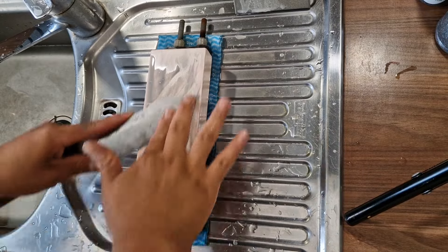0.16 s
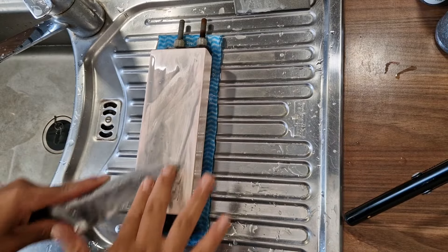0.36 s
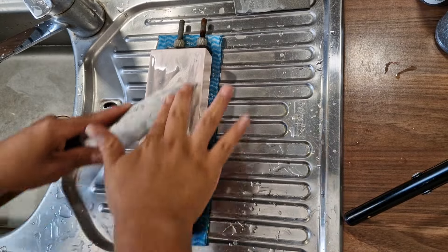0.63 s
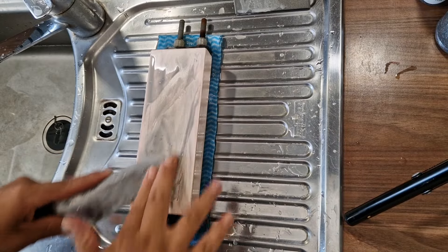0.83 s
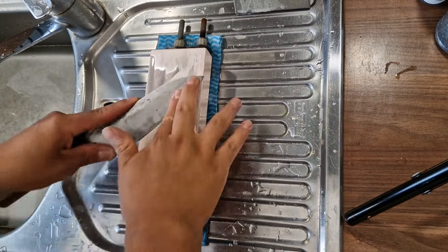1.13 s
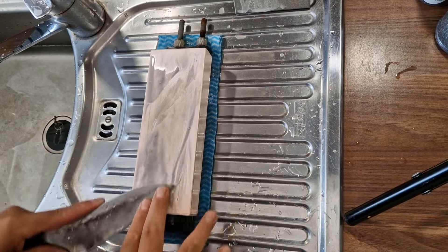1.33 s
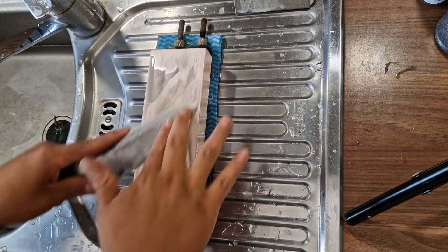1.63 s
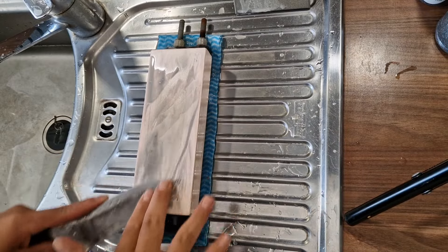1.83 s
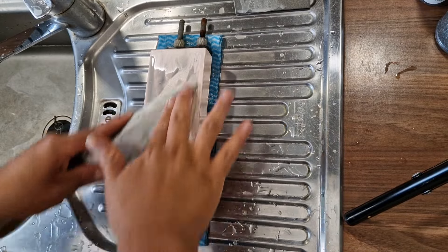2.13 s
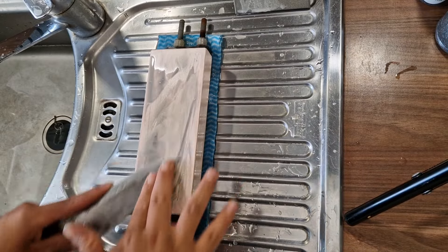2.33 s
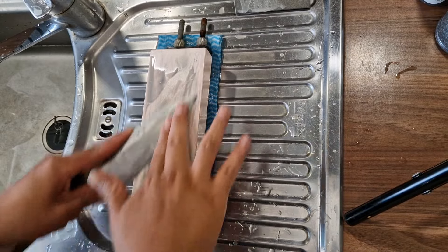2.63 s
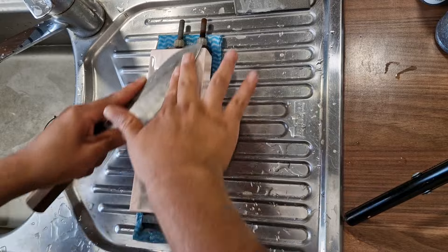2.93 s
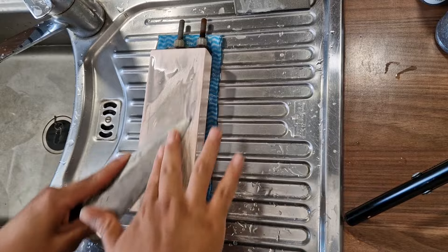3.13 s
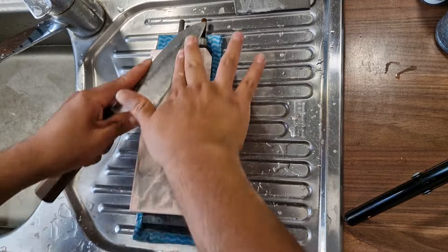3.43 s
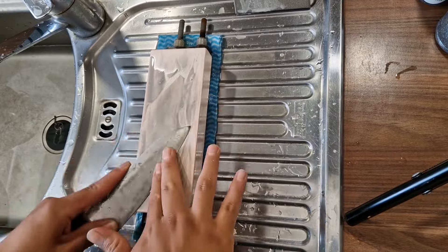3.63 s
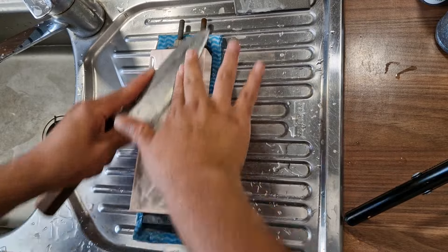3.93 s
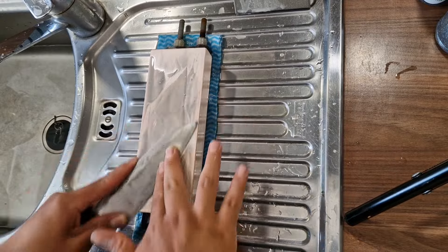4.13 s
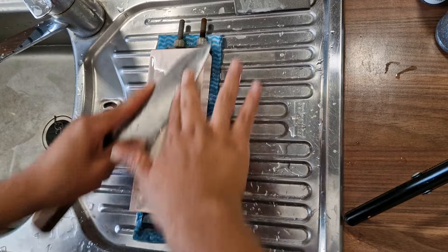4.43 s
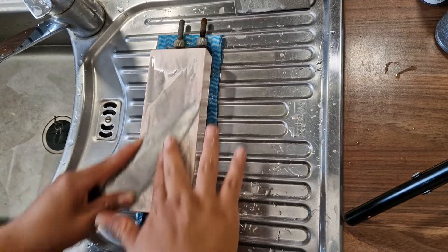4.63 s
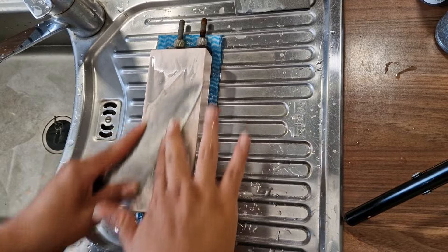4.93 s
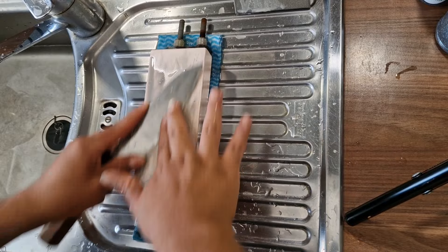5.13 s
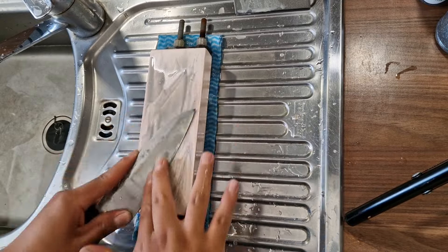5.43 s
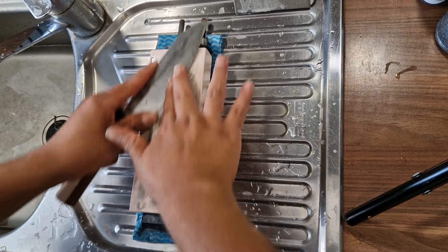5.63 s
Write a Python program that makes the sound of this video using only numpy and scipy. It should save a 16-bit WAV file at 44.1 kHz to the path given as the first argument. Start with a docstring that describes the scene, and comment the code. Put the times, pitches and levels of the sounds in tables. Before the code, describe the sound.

Rapid to-and-fro knife sharpening on a wet stone, a hissy metallic scrape dipping briefly at every reversal over faint kitchen rumble.

```python
"""Gritty hiss comes first, over a hum and a low drone: a steel knife is pushed and pulled along a wet whetstone
on a sink's draining board, close to a stereo microphone. Coloured noise makes the grit's hiss and rings the blade,
whose modes glide and fade as the contact slides. At each turn of the hands the hiss sinks for an instant
and decaying sines thump the counter. Two cracks and a dull tick stand out;
a wavering sine and filtered noise fill the kitchen."""
import sys
import numpy as np
from scipy import signal
from scipy.io import wavfile
from scipy.ndimage import uniform_filter1d

SR = 44100
rng = np.random.default_rng(int(sys.argv[2]) if len(sys.argv) > 2 else 0)


def bounce(signal):
    """Save signal as a 16-bit WAV file at the path given by the first command-line argument."""
    frames = np.transpose(np.atleast_2d(signal))
    limited = np.clip(frames, -1, 1)
    pcm = np.round(limited * 32767).astype(np.int16)
    wavfile.write(sys.argv[1], SR, pcm)


N = 254456
SIZE, HOP = 2048, 256  # spectral frame and step [samples]
HZ = np.fft.rfftfreq(SIZE, 1 / SR)[:, None]
FRAME_S = np.arange(-(-N // HOP) + 1) * HOP / SR
T = np.arange(N) / SR

# the kitchen's hum: (time [s], pitch [Hz], level before its waver [dB])
HUM = [(0.0, 86.2, -59), (0.72, 86.5, -51), (1.01, 87.7, -62), (1.3, 88.8, -62), (1.38, 89.7, -85),
       (1.49, 85.75, -58.5), (1.96, 86.8, -53), (2.45, 90, -73), (2.57, 90.3, -57), (3.05, 89.5, -63),
       (3.15, 89.1, -58.5), (3.6, 89.6, -58.5), (4.39, 90.1, -55.5), (4.46, 89.4, -67), (5.22, 88.9, -56),
       (5.77, 91.3, -61.5)]
# swelling drone: (time [s], middle band [dB], upper band [dB], bass band [dB])
DRONE = [(0.0, -66, -81, -62), (0.35, -72, -65.5, -69), (0.8, -67, -74.5, -65), (1.65, -74.5, -87, -66.5),
         (1.8, -70, -72.5, -61.5), (2.96, -73, -78, -69.5), (3.3, -67.5, -79.5, -59),
         (3.52, -65.5, -63.5, -64), (3.76, -69.5, -78, -67), (4.3, -75, -86, -57.5),
         (5.35, -71.5, -77, -64), (5.53, -59.5, -74, -63), (5.77, -71.5, -74, -59)]
# colour of the room's rumble: (frequency [Hz], relative density [dB per Hz])
RUMBLE_COLOUR = [(11, -9), (18, 8), (96, 12), (148, -4), (220, -62), (314, -13), (422, -31), (718, -15),
                 (792, -20.5), (1300, -16.5), (1640, -14), (1850, -36), (2000, -48), (2600, -94),
                 (4400, -120)]
RUMBLE_DB = -57.5
# likeness of the two microphone ports: (frequency [Hz], likeness [0-1])
PORT_LIKENESS = [(100, 1), (250, 1), (500, 0.57), (1300, 0.42), (2400, 0.077), (4400, 0.51), (6000, 0.1),
                 (15000, 0.045)]
# phase between the ports: (frequency [Hz], lead of the left [radians])
LEFT_LEAD = [(0, -0.5), (860, 0.77), (1210, 4), (1720, -1.5), (2330, -0.76), (3270, 12.5), (3530, 13.5),
             (4310, 17), (5080, 19), (7840, 8.5), (8960, 19), (10600, 13), (14200, 28.5), (16500, 7)]
# balance of the ports: (frequency [Hz], left minus right [dB])
PORT_TILT = [(60, 3), (92, -1.5), (140, 0.5), (210, -5.5), (330, 8), (500, 2.5), (770, 1.5), (1170, -0.5),
             (1790, 6), (2740, -2), (4190, -0.5), (6410, -3.5), (9810, -1.5), (15000, -0.5)]

# modes of the counter: (frequency [Hz], level relative to the thump [dB], t60 [s])
COUNTER_MODES = [(31.96, 4, 0.5), (47, -1, 0.11), (78, -10, .07)]
# dull tick, stronger on the left: (time [s], left peak [dB])
TICKS = [(2.6498, -36)]
# the edge catches a coarse grain: (time [s], level [dB], t60 of the crack [s])
SNAPS = [(2.8986, -23, .016), (4.7644, -36, .025)]

# each stroke starts where the blade reverses, pushes and pulls in turn; levels before fades and lifts:
# (start [s], thump [dB], fall of the hiss in the pause [dB], hiss [dB], swell of the hiss over the stroke [dB],
#  ring of the low, middle, high and top modes [dB each], top of the middle glide [Hz])
STROKES = [(0.0, -54, 4.9, -49, -1.5, -90, -69, -55.5, -55, 3100.0),
           (0.206, -48, 6.6, -49, 6, -72, -54.5, -51.5, -53, 2930.0),
           (0.444, -46.5, 4.3, -48.5, 1, -76, -71, -56.5, -51, 3140.0),
           (0.675, -49, 3.6, -46.5, 4, -82, -60, -52.5, -55, 3053),
           (0.889, -55, 4.3, -51, 3, -81, -57.5, -56, -54, 3000),
           (1.119, -65, 6, -49.5, -5, -70.5, -48, -53, -53, 2700),
           (1.356, -64, 8.7, -49.5, 0.5, -92, -71, -54.5, -54, 3060),
           (1.587, -61, 3.5, -51.5, -4, -80.5, -59.5, -56, -53.5, 2730),
           (1.789, -68, 5.5, -47.5, 16, -80, -58.5, -53, -52.5, 2800),
           (2.047, -48, 8.7, -48, -16.5, -73.5, -53.5, -54.5, -52.5, 2740),
           (2.289, -52.5, 3.9, -47, 7, -68, -50, -51, -47, 2640),
           (2.524, -48, 7.6, -48, -12.5, -62, -56, -53, -49, 3140),
           (2.74, -56, 4.4, -49.5, 6.5, -64, -50.5, -52.5, -48.5, 3200),
           (2.964, -46, 5, -49.5, -1, -61, -52, -54.5, -51, 3140.0),
           (3.182, -50, 4.5, -49.5, 9, -59, -48.5, -50, -52.5, 3230.0),
           (3.418, -46, 6.3, -48.5, -5, -56, -50, -52, -51, 3270.0),
           (3.635, -51, 6, -49.5, 4.5, -57.5, -51.5, -52, -50.5, 3000),
           (3.871, -43.5, 5.6, -49.5, 6, -56, -48.5, -52, -50.5, 3070),
           (4.081, -47.5, 3.9, -47.5, -1, -58.5, -48, -48, -48, 2890.0),
           (4.33, -44, 7.8, -47.5, 2, -55, -50, -50.5, -50, 3040),
           (4.556, -52, 4, -50, -1, -54.5, -48.5, -50.5, -52.5, 2990),
           (4.793, -45.5, 8, -50, 1, -58, -49, -51.5, -49.5, 2930),
           (5.001, -47, 4, -52, -3, -64.5, -56.5, -51, -50, 2970.0),
           (5.231, -43, 8, -49, 5, -68, -56.5, -52.5, -50.5, 2970),
           (5.446, -47, 7, -49, -5.5, -63.5, -64.5, -53, -51, 3270.0),
           (5.687, -46, 7.9, -47, 4, -73, -70, -60, -57, 3290)]
LAST_END_S = 5.9
# spread of the dip at a turn, and how long after the turn it is deepest
PAUSE_S, PAUSE_LATE_S = 0.0078, 0.0091
# part of the edge on the stone:
# (time [s], place [0 heel - 1 tip], middle glide at the far end [Hz], high gliding mode [Hz])
EDGE_PART = [(0, 0.058, 2480, 5200), (1.1, .03, 2450, 5150), (2.1, 0.045, 2800, 5280),
             (2.9, 0.74, 3000, 5150), (3.42, 0.84, 3160, 5220), (3.87, 0.8, 2880, 5100),
             (4.33, 0.91, 2324, 5300), (4.79, 1, 2290, 4950), (5.25, 0.89, 2300, 5000),
             (5.77, 1, 2790, 4900)]
# the edge bites into a coarser patch of stone:
# (time [s], lift of the low and middle modes [dB], lift of the high and top modes [dB])
BITES = [(0.139, 5, 6), (0.311, 8.5, 5), (.778, 13, 1), (1.03, 5, 4), (1.075, 3, 6), (1.165, 7, 1),
         (1.21, 1, 8.5), (1.541, 9, 3), (1.676, 10.5, 4), (2.005, 12, 1), (2.145, 2.5, 2.5),
         (2.41, 5, -1.5), (2.592, 10, 3), (2.782, 5.5, 6.5), (.565, -2, 1.5), (3.023, 10, 4.5),
         (3.203, 4.5, 4.5), (3.387, 3, 1), (3.512, -2, -0.5), (3.662, 1, 3), (3.84, 9, 4), (4.235, 5, -1),
         (4.29, 0.5, 4), (4.385, 2.5, 4.5), (4.44, 3.5, 1), (4.649, 2.5, 3), (4.769, 0, 5.5),
         (4.835, 3, 1.5), (4.899, 1, -1.5), (5.096, 10.5, 4.5), (5.318, 8.5, 0), (5.473, 14, 6),
         (5.757, 11.5, 4)]
BITE_S, BITE_HISS = 0.027, 0.6  # spread in time; share of the upper lift that reaches the hiss

# colour of the bare grit: (frequency [Hz], relative density [dB per Hz])
GRIT_COLOUR = [(1000, -25), (1800, -25.5), (2300, -10), (3000, -7.5), (4100, -16), (4700, -12.5),
               (5800, -11), (7300, -9), (9600, -9.5), (11600, -1), (13500, 0), (15800, -1.5)]
# hiss fade at the near end of the stone (heel dB, tip dB); reach as share of the stone
NEAR_FADE_DB, NEAR_REACH = (-8.5, -3), 0.13
HUMP_DB, HUMP_PER_DB, USUAL_HISS_DB = 7, -0.44, -49.5  # lower treble over the bare grit; its answer to the hiss

# blade modes beside the gliding ones, one table a group:
# (frequency [Hz], width [Hz], level within the group before it wanders [dB])
LOW_MODES = [(738, 22, -17.5), (874, 73, -12.5), (1377, 44, -5.5)]
MIDDLE_MODES = [(2230, 60, -9), (2445, 70, -9), (3150, 90, -12), (3880, 200, -7)]
HIGH_MODES = [(4127, 514, -2.5), (5513, 38, -0.5)]
TOP_MODES = [(6304, 114, -5.5), (6426, 220, -6), (7370, 380, -0.5), (7810, 1300, -8.5)]
# rows for low, middle, high and top modes; place is where on the stone, change is one stone away from there:
# (place at heel [0 near - 1 far], change at heel [dB], place at tip [0-1], change at tip [dB])
RING_PLACES = [(.75, 10, 0.53, -65), (.75, -66.5, 0.64, -7.5), (.75, -14.5, .3, 2), (.8, -13.5, 1, -1)]
LOW_HZ, LOW_NEAR_RISE_HZ = (1664, 1397), 216  # low glide at heel and tip; rise towards the near end
MIDDLE_NEAR_HZ, MIDDLE_TOP_PLACE = 2800, .52  # the middle glide runs from the near end to its turning place
HIGH_WANDER_HZ = 80  # rms


def amp(db):
    """Amplitude factor of a level in dB."""
    return 10 ** (np.asarray(db) / 20)


def intensity(db):
    """Power factor of a level in dB."""
    return amp(2 * np.asarray(db))


def evened(x):
    """Scales a signal to rms 1."""
    return x / np.sqrt(np.mean(x ** 2) + 1e-20)


def smoothed_twice(x, span):
    """Two running means in a row."""
    return uniform_filter1d(uniform_filter1d(x, span), span)


def read(points, hz):
    """Reads a curve between its points on a logarithmic frequency scale."""
    f, value = np.transpose(points)
    return np.interp(np.log(hz + 1), np.log(f + 1), value)


def over_time(table):
    """Reads every column after the time of a table at each frame."""
    s, *columns = np.transpose(table)
    return [np.interp(FRAME_S, s, column) for column in columns]


def add(mix, s, sound):
    """Lays a sound into the mix at s seconds, cut at the end."""
    part = mix[..., round(s * SR):][..., :sound.shape[-1]]
    part += sound[..., :part.shape[-1]]


def drift(count, seconds):
    """Rows of slow chance at frame rate, rms 1."""
    span = max(round(seconds * SR / HOP), 1)
    return evened(smoothed_twice(rng.standard_normal((count, len(FRAME_S))), span))


def mode(hz, width):
    """Power response of a steep resonance, top 1."""
    return 1 / (1 + (2 * (HZ - hz) / width) ** 2) ** 1.276


def unit(power):
    """Scales each frame's power response so that white noise of rms 1 keeps rms 1."""
    return power / power.mean(0)


def coloured(pair, power):
    """Colours two unrelated drives and blends them into what the two microphone ports pick up."""
    left, other = signal.stft(pair, nperseg=SIZE, noverlap=SIZE - HOP)[2]
    same = read(PORT_LIKENESS, HZ)
    right = same * left + np.sqrt(1 - same ** 2) * other
    right = right * np.exp(-1j * read(LEFT_LEAD, HZ))
    tilt = amp(read(PORT_TILT, HZ) / 2)  # half on each side
    ports = np.array([left * tilt, right / tilt]) * np.sqrt(power)
    return signal.istft(ports, nperseg=SIZE, noverlap=SIZE - HOP)[1][:, :N]


def hum():
    """A single sine whose pitch wanders and whose level wavers."""
    s, hz, db = np.transpose(HUM)
    waver_db = 0.89 * np.interp(T, FRAME_S, drift(1, 0.031)[0])
    level = np.sqrt(2) * amp(np.interp(T, s, db) + waver_db)
    return level * np.sin(2 * np.pi * np.cumsum(np.interp(T, s, hz)) / SR)


def drone_and_rumble():
    """White noise through swelling resonant bands and the room's low colour, streaked by slow chance."""
    middle_db, upper_db, bass_db = over_time(DRONE)
    bands = unit(mode(316, 51)) * intensity(middle_db)
    bands += unit(mode(500, 280)) * intensity(upper_db)
    bands += unit(mode(135.6, 20) + intensity(3) * mode(115.0, 20)) * intensity(bass_db)
    rumble = unit(intensity(read(RUMBLE_COLOUR, HZ)) * (HZ < 3000)) * intensity(RUMBLE_DB)
    streaks = intensity(2.75 * drift(len(HZ), 0.23))
    return coloured(rng.standard_normal((2, N)), (bands + rumble) * streaks)


def thumps(cycles=0.21):
    """Each reversal shoves the stone; the counter rings, its deepest modes swelling last."""
    t, out = np.arange(SR // 2) / SR, np.zeros(N)
    ring = np.zeros(len(t))
    for hz, db, t60 in COUNTER_MODES:
        onset = 1 - np.exp(-t * hz / cycles)
        ring += amp(db - 60 * t / t60) * np.sin(2 * np.pi * hz * t) * onset
    for s, db, *_ in STROKES:
        add(out, s, amp(db) * ring)
    return out


def ticks():
    """A dull tick: one pulse that peaks after 0.1 ms and dies away, 9 dB weaker on the right."""
    t, out = np.arange(SR // 6) / SR, np.zeros((2, N))
    pulse = t / .0001 * np.exp(1 - t / .0001)
    for s, db in TICKS:
        add(out, s, amp([[db], [db - 9]]) * pulse)
    return out


def snaps():
    """A caught grain gives a bright crack of noise and leaves the blade's upper modes ringing."""
    t, out = np.arange(SR // 6) / SR, np.zeros((2, N))
    bright = signal.butter(4, [2600, 14000], "bandpass", fs=SR, output="sos")
    for s, db, t60 in SNAPS:
        burst = amp(db - 60 * t / t60)
        tail = amp(db - 19 - 60 * t / .14)
        shape = (burst + tail) * (1 - np.exp(-t / .0012))
        crack = signal.sosfilt(bright, rng.standard_normal((2, len(t))) * shape)
        ring = np.zeros((2, len(t)))
        for hz, _, mode_db in HIGH_MODES + TOP_MODES:
            phase = rng.uniform(0, 2 * np.pi, (2, 1))
            ring += amp(mode_db - 60 * t / (2.8 * t60)) * np.sin(2 * np.pi * hz * t + phase)
        add(out, s, crack + amp(db - 14) * ring)
    return out


def motion():
    """For each frame: the stroke's row, how far it has run (0-1) and the place on the stone (0 near, 1 far)."""
    turns = np.append(np.transpose(STROKES)[0], LAST_END_S)
    run = np.interp(FRAME_S, turns, np.arange(len(turns)))
    which = np.minimum(run.astype(int), len(STROKES) - 1)
    done = run - which
    reach = np.where(which % 2, 1 - done, done)  # every second stroke comes back
    place = (reach + np.sin(np.pi * reach / 2) ** 2) / 2  # the hands slow down towards a turn
    return np.array(STROKES)[which].T, done, place


def bites():
    """A coarser patch lifts the lower and the upper modes for a moment, as a bell-shaped bump in dB."""
    when, *lifts = np.transpose(BITES)
    bumps = np.exp(-.5 * ((FRAME_S - when[:, None]) / BITE_S) ** 2)
    return np.array(lifts) @ bumps


def pauses():
    """Fall of the hiss around each turn in dB; it sinks into the pause and returns faster."""
    fall_db = np.zeros(N)
    for turn, _, db, *_ in STROKES:
        late = (T - turn - PAUSE_LATE_S) / PAUSE_S
        fall_db += db * np.exp(-.5 * (late * np.where(late > 0, 1.8, .7)) ** 2)
    return fall_db


def grit(spread_db=0.5, chatter_db=0.78):
    """Dense grains of uneven size tear at the edge; the pressure chatters."""
    sizes = amp(spread_db * np.minimum(rng.exponential(1, (2, N)), 5))
    chatter = evened(smoothed_twice(rng.standard_normal(N), 200))
    return evened(rng.standard_normal((2, N)) * sizes * amp(chatter_db * chatter))


def bare_grit(hiss_db):
    """Colour of the grit without the blade; a broad lower-treble hump follows the hiss only in part."""
    bare = intensity(read(GRIT_COLOUR, HZ)) * (HZ > 900)
    bare = bare / (bare * (HZ > 11000)).mean()  # the treble above 11 kHz sets the level
    # relative to the rest, the hump sinks as the hiss grows
    hump_db = HUMP_DB + HUMP_PER_DB * (hiss_db - USUAL_HISS_DB)
    return bare * intensity(hump_db * mode(6060, 7700))  # the resonance shapes the lift in dB


def flicker(patchy_db=2.5, streaky_db=4.0, gain_db=1.5):
    """Thin streaks of chance flicker in level over broader patches of chance, with a fixed gain."""
    patches = evened(uniform_filter1d(drift(len(HZ), .04), size=16, axis=0))
    streaks = evened(uniform_filter1d(drift(len(HZ), 0.053), size=2, axis=0))
    streaks = streaks / (1 + HZ / 12000)  # calmer towards the treble
    return intensity(patchy_db * patches + streaky_db * streaks + gain_db)


def rasp(wander_db=2.0, pressure_db=1.14, ring_sway_db=0.94):
    """The grit is heard bare and through the blade's modes, which glide and fade as the contact moves."""
    (_, _, _, level_db, swell_db, *rings, glide_hz), done, place = motion()
    part, far_hz, high_hz = over_time(EDGE_PART)
    lower_db, upper_db = bites()

    def blend(heel, tip):
        """Mixes heel and tip settings by the part of the edge on the stone."""
        return heel + (tip - heel) * part

    def eased(x):
        """Rounds off jumps between strokes."""
        return uniform_filter1d(x, size=4)

    near_fade_db = blend(*NEAR_FADE_DB) * np.exp(-place / NEAR_REACH)
    hiss_db = eased(level_db + swell_db * (done - .5) + near_fade_db)
    hiss_db = hiss_db + BITE_HISS * upper_db + pressure_db * drift(1, .025)[0]

    # ring of each group relative to the hiss
    ring_db = []
    lifts, sways = (lower_db, lower_db, upper_db, upper_db), drift(4, .03)
    for db, (heel, heel_db, tip, tip_db), lift, sway in zip(rings, RING_PLACES, lifts, sways):
        away_db = blend(heel_db, tip_db) * (place - blend(heel, tip)) ** 2
        ring_db.append(eased(db + away_db) + lift - 3.0 + ring_sway_db * sway - hiss_db)
    ring_db[0] = np.minimum(ring_db[0], -3)  # the low modes never drown the hiss

    low_hz = blend(*LOW_HZ) + LOW_NEAR_RISE_HZ * (1 - place) ** 3
    top = MIDDLE_TOP_PLACE
    beyond_hz = glide_hz + (far_hz - glide_hz) * (place - top) / (1 - top)
    before_hz = glide_hz + (MIDDLE_NEAR_HZ - glide_hz) * (1 - place / top)
    middle_hz = np.where(place > top, beyond_hz, before_hz)
    high_hz = high_hz + HIGH_WANDER_HZ * drift(1, 0.079)[0]
    glides = mode(low_hz, 66), intensity(-2.5) * mode(middle_hz, 200), mode(high_hz, 290), 0  # none on top

    power = bare_grit(hiss_db)
    groups = LOW_MODES, MIDDLE_MODES, HIGH_MODES, TOP_MODES
    for modes, db, response in zip(groups, ring_db, glides):
        wanders = wander_db * drift(len(modes), 0.03)
        for (hz, width, mode_db), wander in zip(modes, wanders):
            response = response + intensity(mode_db + wander) * mode(hz, width)
        power = power + intensity(db) * unit(response)
    sound = coloured(grit(), power * flicker()) * amp(np.interp(T, FRAME_S, hiss_db))

    # the low modes ring on through the pause
    low_pass = signal.butter(4, 2000, fs=SR, output="sos")
    deep = signal.sosfiltfilt(low_pass, sound)
    fall_db = pauses()
    return (sound - deep) * amp(-fall_db) + deep * amp(-.3 * fall_db)


def scene():
    """The kitchen behind, the counter and the catches of the edge, and the rasp of the blade in front."""
    return hum() + drone_and_rumble() + thumps() + ticks() + snaps() + rasp()


def record(dry):
    """The band limit of the recorder: a steep low-pass at 15950 Hz."""
    low_pass = signal.firwin(801, 15950, window=("kaiser", 10), fs=SR)
    return signal.oaconvolve(dry, low_pass[None], "same")


dry = scene()
out = record(dry)
bounce(out)
```